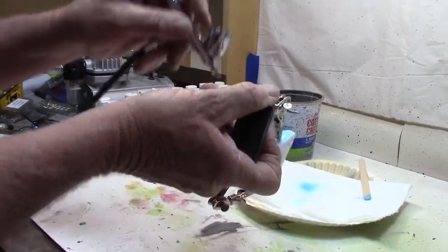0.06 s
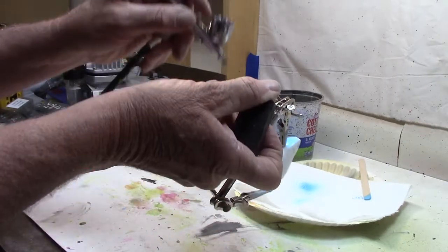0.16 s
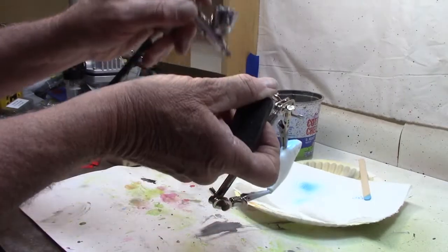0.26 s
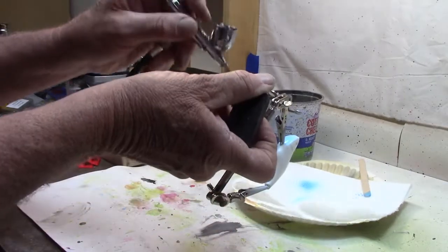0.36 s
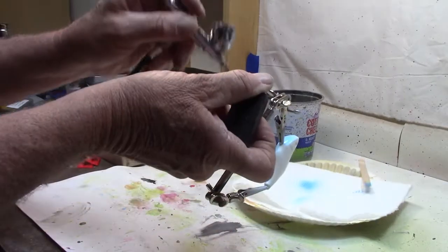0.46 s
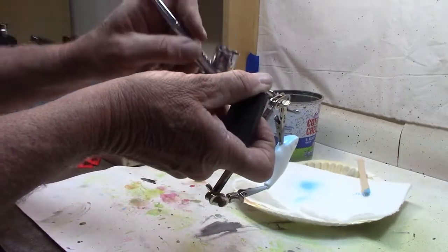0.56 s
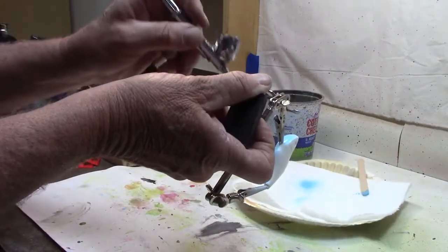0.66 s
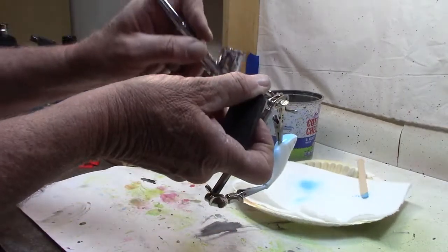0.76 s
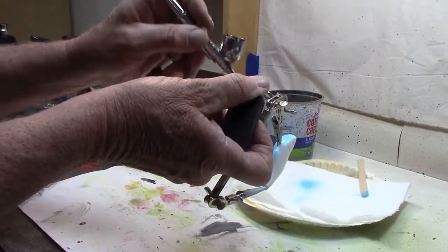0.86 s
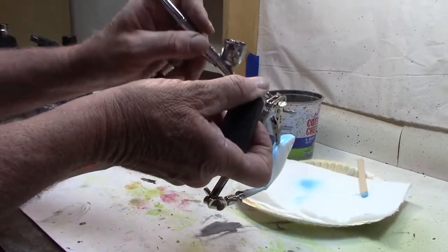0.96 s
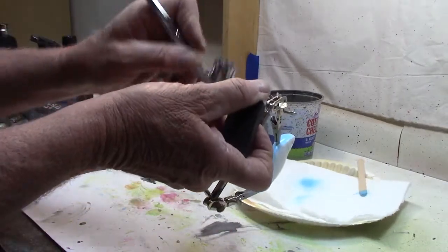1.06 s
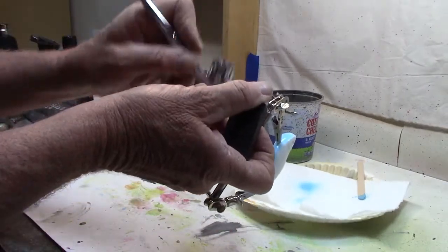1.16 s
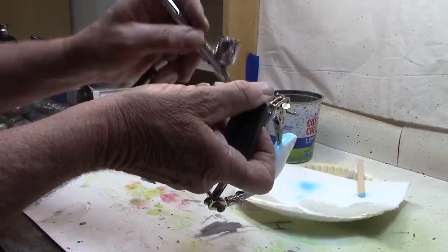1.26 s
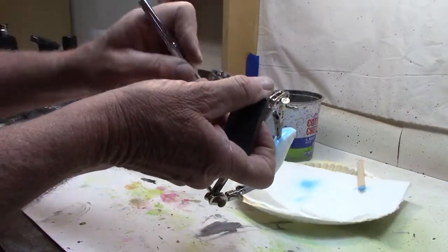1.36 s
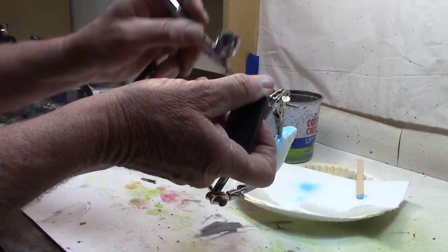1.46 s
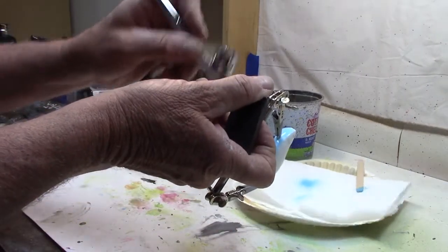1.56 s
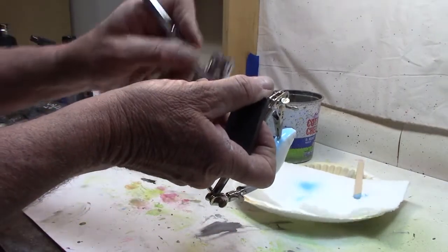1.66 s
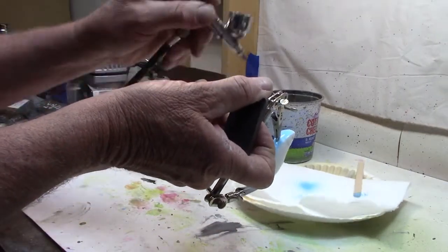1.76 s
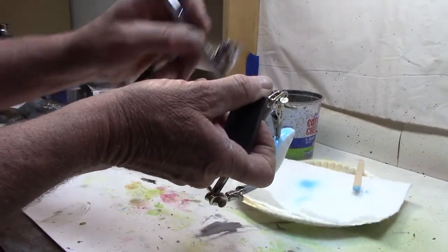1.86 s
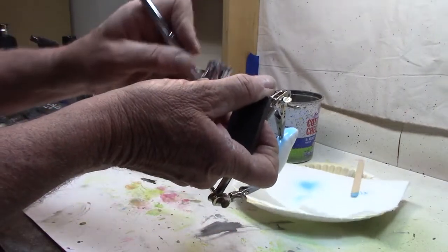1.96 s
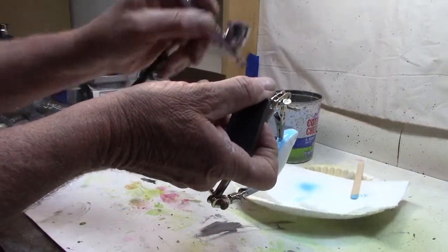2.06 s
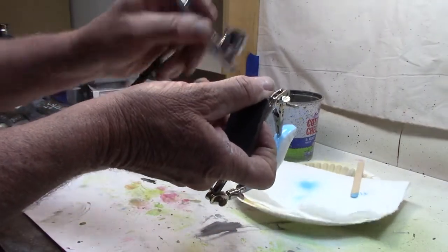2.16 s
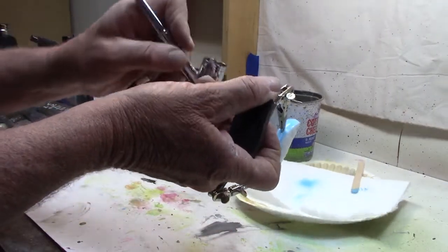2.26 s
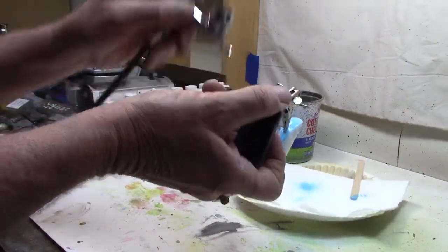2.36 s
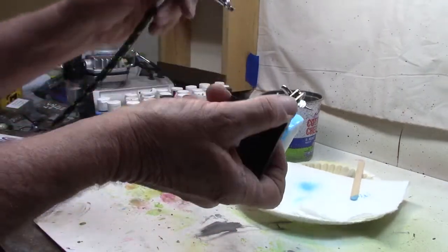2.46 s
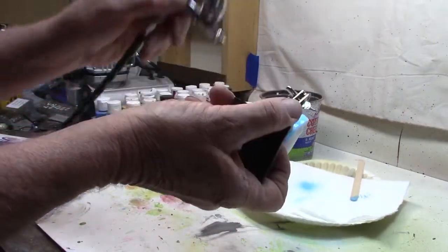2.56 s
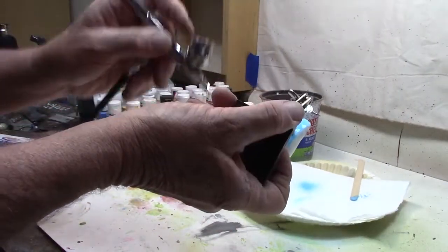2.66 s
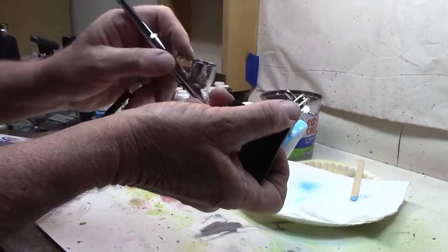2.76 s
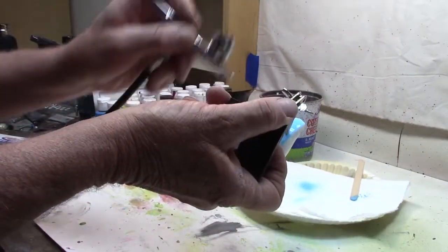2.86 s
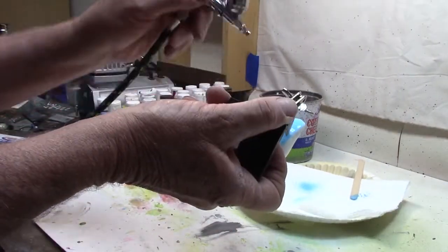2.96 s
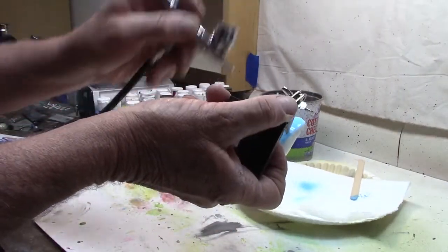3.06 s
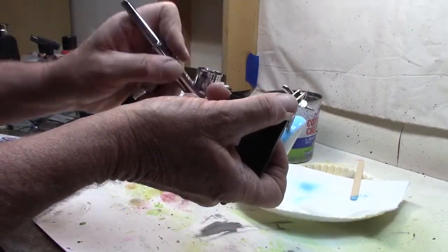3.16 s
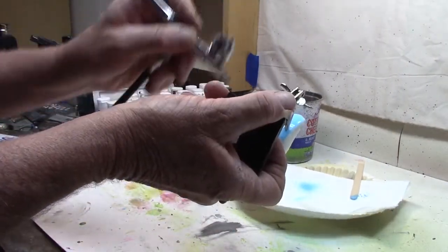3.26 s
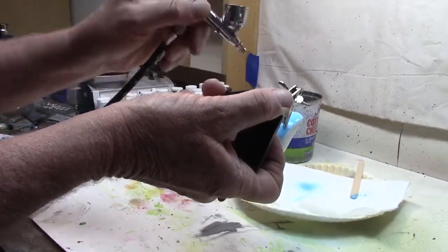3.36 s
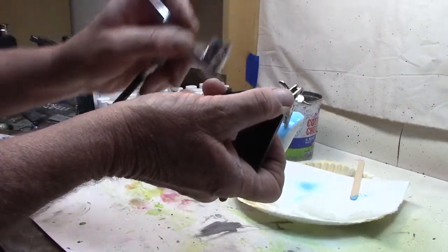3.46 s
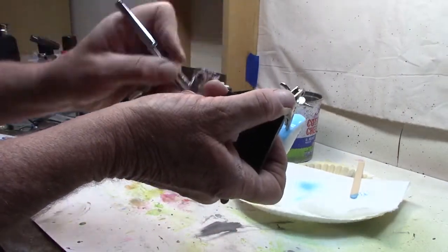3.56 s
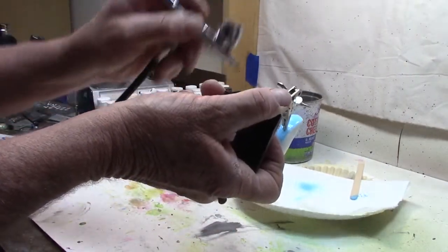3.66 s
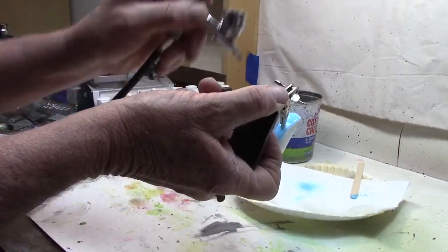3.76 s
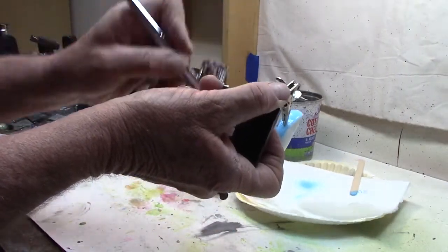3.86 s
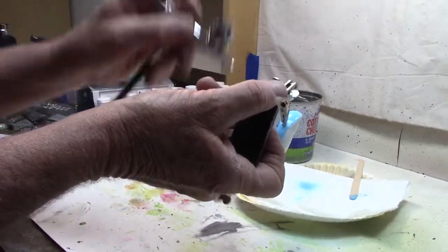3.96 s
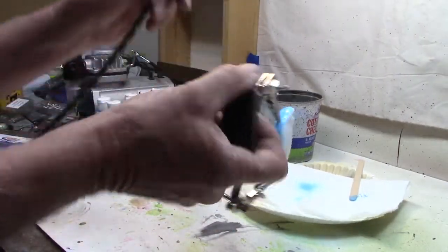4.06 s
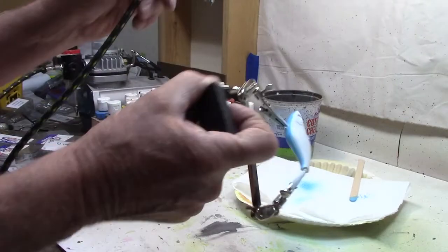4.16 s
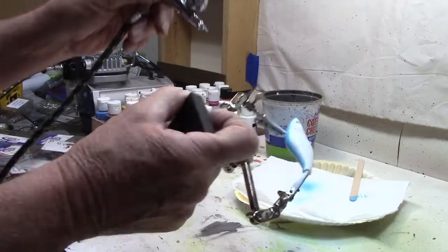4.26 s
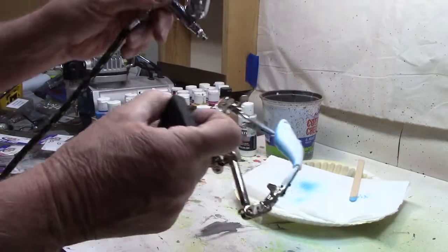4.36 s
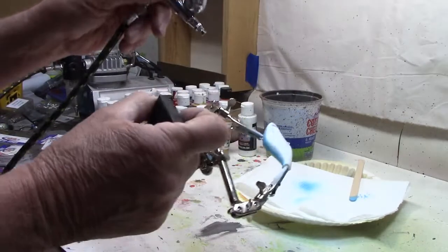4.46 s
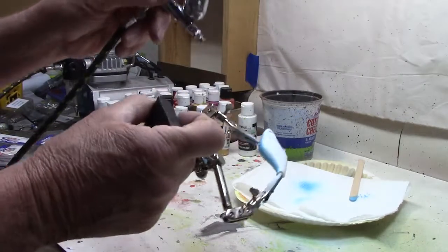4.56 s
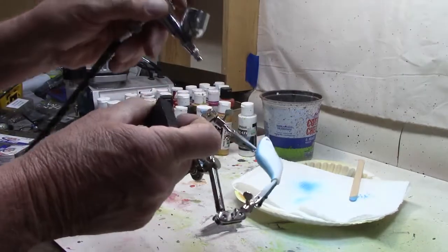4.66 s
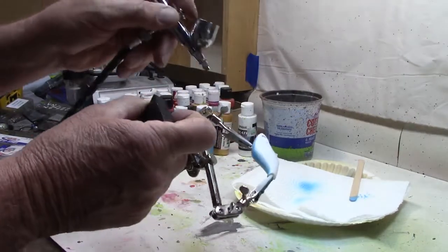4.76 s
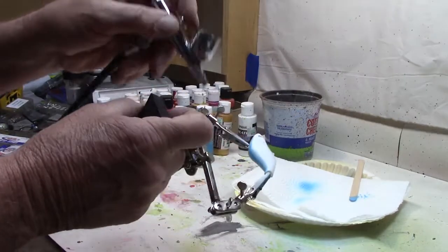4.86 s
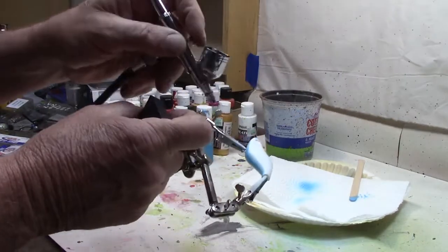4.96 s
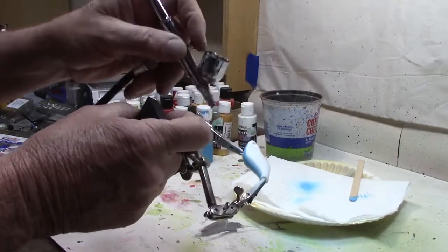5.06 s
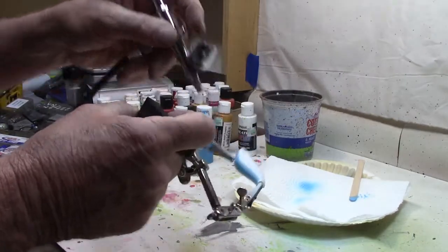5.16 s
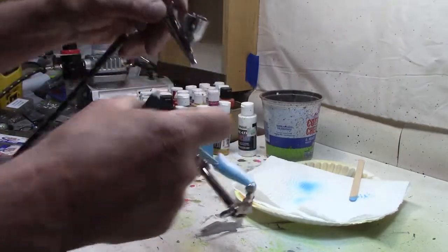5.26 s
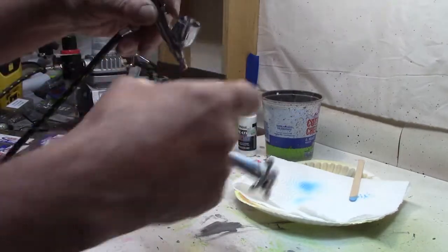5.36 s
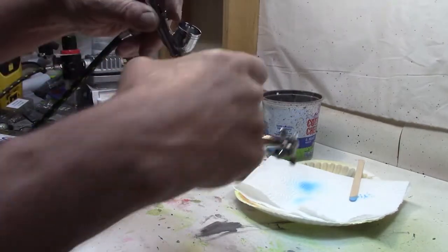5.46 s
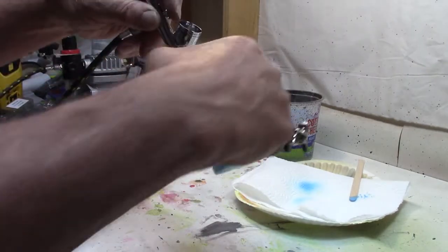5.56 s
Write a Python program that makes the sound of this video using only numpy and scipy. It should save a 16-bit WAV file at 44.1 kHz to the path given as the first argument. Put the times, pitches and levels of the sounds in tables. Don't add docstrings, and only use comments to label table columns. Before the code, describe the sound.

A small piston compressor knocks about twenty-seven times a second, a hard rattling drone already running. An airbrush sprays a long hiss over it, swelling with each pass at a small piece, then snaps shut. A shorter second burst follows and snaps off. Finally a switch clicks, the pump coasts down in slowing thuds, and tiny metal ticks remain. Close stereo microphone, small workshop.

```python
import sys
import numpy as np
from scipy import signal
from scipy.fft import rfft, irfft, next_fast_len
from scipy.io import wavfile
from scipy.ndimage import uniform_filter1d

SR = 44100
rng = np.random.default_rng(int(sys.argv[2]) if len(sys.argv) > 2 else 0)


def invert_db(x):
    u = np.asarray(x, float) / 20
    return 10 ** u


def digitize_waveform(pressure):
    field = np.atleast_2d(pressure).T
    bounded = np.clip(field, -1, 1)
    quanta = np.round(bounded * 32767).astype(np.int16)
    wavfile.write(sys.argv[1], SR, quanta)


N = 246959
TIME = np.arange(N) / SR
STOP_S = 5.0489
SLACK_FADE_S = 5.41
WEAR_DB_PER_S = 0.7


def rms_one(x):
    return x / np.sqrt(np.mean(x ** 2) + 1e-20)


def in_time(rows):
    s, *columns = np.transpose(rows)
    return np.array([np.interp(TIME, s, c) for c in columns])


def after(s):
    return np.maximum(TIME - s, 0)


def at_hz(points, hz):
    points = np.array(points)
    return np.interp(np.log(hz), np.log(points[:, 0]), points[:, 1])


def drift(rate):
    knots = np.arange(0, N / SR + 1, .5 / rate)
    return np.interp(TIME, knots, rng.standard_normal(len(knots)))


def colour(x, spectrum):
    size = next_fast_len(N + 4096)
    hz = np.arange(size // 2 + 1) * SR / size + 1
    return irfft(rfft(x, size) * invert_db(at_hz(spectrum, hz)), size)[..., :N]


def ring(clicks, hz, t60):
    r = invert_db(-60 / (t60 * SR))
    w = 2 * np.pi * hz / SR
    return signal.lfilter([0, np.sin(w)], [1, -2 * r * np.cos(w), r * r], clicks + 1e-18)


def whistle(hz, width_hz):
    t60 = 2.2 / width_hz
    once = ring(rng.standard_normal(N), hz, t60)
    return rms_one(ring(once, hz, t60))


def click(s, db):
    out = np.zeros(N)
    out[round(s * SR)] = invert_db(db)
    return out


def crack(s, db, t60):
    return rng.standard_normal(N) * (TIME >= s) * invert_db(db - 60 * after(s) / t60)


# time in seconds, turns done.
CRANK = [(.0097, 0), (.7352, 20), (1.4604, 40), (2.1863, 60), (2.5505, 70), (3.2799, 90), (4.0081, 110),
         (4.7398, 130), (5.0691, 139), (5.133, 140), (5.2059, 141), (5.2845, 142), (5.3844, 143),
         (5.53, 144)]


def crank_turns():
    return in_time(CRANK)[0] + np.minimum(TIME - CRANK[0][0], 0) * 27.6


def struck(contacts, level_db, jitter_ms, spread_db, shift=((0, 0), (6, 0))):
    s, turns = np.transpose(CRANK)
    s, turns = np.r_[2 * s[0] - s[1], s], np.r_[-turns[1], turns]
    count = np.arange(-4, 144)
    later = np.interp(np.interp(count, turns, s), *np.transpose(shift))
    out = np.zeros(N)
    for late, hz, t60, db, ms in contacts:
        chance = rng.standard_normal((len(count), 3))
        wander_db = 0.5 * rms_one(uniform_filter1d(chance[:, 2], size=9))
        at = (np.interp(count + late + later, turns, s) + chance[:, 0] * jitter_ms / 1000) * SR
        size = invert_db(db + spread_db * chance[:, 1] + wander_db)
        at, size = at[at > 0], size[at > 0]
        i, part = at.astype(int), at % 1
        clicks = np.zeros(N)
        clicks[i], clicks[i + 1] = size * (1 - part), size * part
        half = int(ms * SR / 1000)
        swell = np.arange(-half, half + 1)
        push = np.hanning(len(swell)) * np.cos(2 * np.pi * hz * swell / SR) / len(swell)
        out += ring(signal.oaconvolve(clicks, push, "same"), hz, t60)
    return rms_one(out) * invert_db(level_db)


def small_body(x):
    return -signal.sosfilt(signal.butter(2, 94, "high", fs=SR, output="sos"), x)


def fresh_db():
    return 3.5 * np.exp(-TIME / 1)


COAST = dict(thud_db=26, rebound_db=90, backlash_db=29, between_db=66, ring_db=39, intake_db=137, shoulder_db=81, reed_db=60, strain_db=61, shake_db=45, whistle_db=232, air_db=73)


def thud_db():
    between = COAST["between_db"] * np.sin(np.pi * crank_turns()) ** 2
    return -36 + fresh_db() - after(STOP_S) * (COAST["thud_db"] + between)


# time in seconds, pressure from 0 to 1, whistle of the outlet valve in dB.
PRESSURE = [(0, 0.26, -48), (2.2, 0.17, -42), (2.45, 0.28, -49), (2.75, 0.5, -48), (3.401, 0.42, -39.5),
            (4.05, 0.47, -45), (4.349, 0.6, -39.5), (4.55, 0.88, -43), (4.75, 0.9, -49.5),
            (5.037, 0.94, -50)]
# turns after the thud, pitch in Hz, ring time t60 in seconds, level in dB, contact in ms.
THUD = [(-0.0222, 225, 0.0022, 14.5, 4.1), (-0.0071, 412, 0.23, -24.5, 6.2), (-0.028, 142, 0.15, -22, 15.3),
        (.6, 230, 0.011, -26, 1.3)]
# turns, pitch in Hz, t60 in seconds, level in dB, contact in ms.
REBOUND = [(-.02, 248, 0.0076, 2.5, 3.05), (-.02, 371, 0.043, -15, 11)]


def thuds():
    rebound_turns = [(s, 0.3482 - 0.12 * pressure) for s, pressure, _ in PRESSURE]
    rebound_db = thud_db() - 5 - after(STOP_S) * COAST["rebound_db"]
    return struck(THUD, thud_db() - 1, 0.068, 0.195) + struck(REBOUND, rebound_db, 0.1, 0.71, rebound_turns)


# time in seconds, ring in dB, upper ring over lower in dB.
SHELL = [(0, -27, 6), (.15, -31, 3.5), (.76, -29, -2), (1.0, -30.5, 0.5), (2.37, -30.5, 0.5),
         (2.75, -35.5, -6), (2.88, -38.5, 24), (2.97, -34.5, -28), (3.1, -40, -5), (3.2, -34.5, -31),
         (3.5, -37.5, -19), (3.6, -34, -17), (3.85, -33.5, -10), (4.2, -33.5, -8), (4.29, -36.5, 22),
         (4.42, -38, -12), (4.62, -40.5, -2), (4.9, -34.5, 14)]
# turns after the thud, pitch in Hz, t60 in seconds, level in dB, contact in ms.
LOWER_RING = [(-0.118, 550.5, 0.3, 0, 3.6)]
# turns, Hz, t60 in seconds, dB, contact in ms.
UPPER_RING = [(-0.114, 577.5, 0.3, 0, 3.4)]


def shell_rings():
    shell, tilt = in_time(SHELL)
    coast = after(STOP_S)
    tilt = tilt * invert_db(-60 * coast)
    ring_db = shell - coast * COAST["ring_db"]
    lower = ring_db - 10 * np.log10(1 + invert_db(2 * tilt))
    upper = ring_db - 10 * np.log10(1 + invert_db(-2 * tilt))
    return struck(LOWER_RING, lower - 1.5, 0.26, 1.0) + struck(UPPER_RING, upper + 1.2, 0.088, 0.33)


# turns after the thud, pitch in Hz, t60 in seconds, level in dB, contact in ms.
INTAKE = [(.61, 992, 0.045, -2, 4.5), (0.608, 936, 0.16, -6, 4.5), (.607, 908, 0.16, -9, 4.5)]


def intake_pop():
    opens = [(s, -0.017 * pressure) for s, pressure, _ in PRESSURE]
    level = -41.5 + 0.76 * (in_time(SHELL)[0] + 35) - after(STOP_S) * COAST["intake_db"]
    return struck(INTAKE, level, 0.033, 0.2, opens)


# turns after the thud, pitch in Hz, t60 in seconds, level in dB, contact in ms.
SHOULDER = [(-.103, 603.5, 0.25, 0, 4.0)]
# time in seconds, level in dB.
SHOULDER_HEARD = [(0, -3), (.3, 4), (.8, -18), (2.3, -20), (2.62, -13), (2.95, -19), (3.4, -14), (4.0, -8),
                  (4.3, -4), (4.75, -5), (5.05, -8)]
# turns, pitch in Hz, t60 in seconds, level in dB, contact in ms.
RIM = [(-.102, 632, .2, -1, 3.0), (-.119, 522, .22, -2, 4.0), (-.101, 687, .16, -1, 3.0),
       (-.1, 715, .03, 3, 2.0)]
# time in seconds, level in dB.
RIM_HEARD = [(0, -41), (2.3, -43), (2.9, -42), (4.0, -39.5), (4.4, -42.5), (5.05, -41.5)]


def head_and_fins():
    fade = COAST["shoulder_db"] * after(STOP_S)
    head = struck(SHOULDER, thud_db() - 5 + in_time(SHOULDER_HEARD)[0] - fade, 0.06, 0.52)
    return head + struck(RIM, in_time(RIM_HEARD)[0] - fade, 0.046, 0.5)


# turns after the thud, pitch in Hz, t60 in seconds, level in dB, contact in ms.
REED = [(-0.135, 1987, 0.09, 6, 1), (.1, 1953, 0.045, 7.5, .6), (.63, 1900, 0.043, -4.5, 0.31),
        (-.1, 1560, 0.2, -10, 0.52), (-.08, 3490, 0.055, 0, .4), (-.05, 4810, 0.058, -1, .3)]
# turns, pitch in Hz, t60 in seconds, level in dB, contact in ms.
STRAIN = [(-0.068, 221, 0.13, 6, 3.6), (-0.041, 411, 0.29, -15, 6.7), (-0.35, 410, 0.1, -26, 2.1),
          (-0.098, 2180, 0.051, -4.5, 0.34), (.03, 2150, 0.038, 3, 0.23), (0.22, 2300, 0.071, -12.5, .4),
          (-0.075, 3520, 0.056, -4, 0.45)]


def reed_and_strain():
    coast = after(STOP_S)
    reed = -45.5 + 0.22 * fresh_db() - WEAR_DB_PER_S * TIME - coast * COAST["reed_db"]
    strain = -43.5 + 5.5 * in_time(PRESSURE)[0] + 1.8 * fresh_db() - coast * COAST["strain_db"]
    return struck(REED, reed, 0.034, 1.1) + struck(STRAIN, strain, 0.036, 0.96)


# shakes per turn, level in dB.
SHAKE = [(1, -26), (2, -42.5), (3, -52)]


def hum_and_shake():
    turns, coast = crank_turns(), after(STOP_S)
    throb = 1 + 4.9 * np.cos(2 * np.pi * turns)
    hum = invert_db(-60.5 - 400 * coast) * throb * np.sin(2 * np.pi * 121 * TIME)
    shake = sum(invert_db(db) * np.sin(2 * np.pi * order * turns) for order, db in SHAKE)
    return hum + shake * invert_db(5 * in_time(PRESSURE)[0] - COAST["shake_db"] * coast)


def compressor():
    knocks = thuds() + shell_rings() + intake_pop() + head_and_fins() + reed_and_strain()
    return small_body(knocks) + hum_and_shake()


def puff(turns, start, rise, fall_db, leak, spread_db=6.5):
    angle = (turns - start) % 1
    stroke = np.floor(turns - start).astype(int) + 2
    flow = np.sin(np.minimum(angle / rise, 1) * np.pi / 2) ** 2
    flow *= invert_db(-fall_db * np.maximum(angle - rise, 0))
    strength = invert_db(spread_db * np.clip(rng.standard_normal(150), -1.5, 1.5))
    return rms_one(flow * strength[stroke] + leak)


# pitch in Hz, width in Hz, level in dB.
VALVE = [(3520, 120, -17), (4900, 140, -27), (5440, 420, -9), (6720, 110, -9.5), (7470, 400, -20),
         (8560, 150, -6), (10600, 92, 2), (11300, 155, -2), (11320, 240, 3.5), (10600, 550, -14),
         (12300, 630, -5)]
# frequency in Hz, level in dB per Hz.
VALVE_AIR = [(1000, -5.5), (1400, -7), (2100, -4), (3000, -12.5), (6000, -17), (9000, -20.5), (12300, -22),
             (13000, -31), (14500, -27), (15500, -40)]
# frequency in Hz, level in dB per Hz.
RATTLE = [(1800, -25), (3000, -2), (5500, -4.5), (8500, -2.5), (11000, -10), (12800, -22), (15500, -30)]


def outlet_valve():
    turns = crank_turns()
    stop_db = after(STOP_S) * COAST["whistle_db"]
    air_db = -44 - WEAR_DB_PER_S * TIME - after(STOP_S + 0.022) * COAST["air_db"]
    tones = rms_one(sum(invert_db(db) * whistle(hz, width) for hz, width, db in VALVE))
    tones *= puff(turns, start=-0.14, rise=0.21, fall_db=56, leak=0.026, spread_db=2.1)
    rattle = rms_one(colour(rng.standard_normal(N), RATTLE))
    rattle *= puff(turns, start=0.073, rise=0.088, fall_db=64, leak=.01, spread_db=2.5)
    air = rms_one(colour(rng.standard_normal(N), VALVE_AIR))
    air *= puff(turns, start=-0.12, rise=0.53, fall_db=17, leak=0.85)
    return invert_db(in_time(PRESSURE)[1] - stop_db) * tones + invert_db(-52.5 - stop_db) * rattle + invert_db(air_db) * air


# frequency in Hz, level in dB per Hz.
ROOM = [(25, 19.5), (60, 5.5), (120, -9.5), (305, -2), (500, -7.5), (1300, -15), (2800, -17), (8800, -25),
        (12000, -34), (13500, -49), (16000, -52)]


def room_tone():
    return invert_db(-46) * rms_one(colour(rng.standard_normal(N), ROOM))


# trigger down, paint flows, trigger up (all in seconds), level in dB, shutting in dB per second.
BURSTS = [
    (0.198, 0.477, 2.362, 0.6, 1409),
    (2.82, 2.859, 3.974, 1.34, 1250),
]
# time and half length in seconds, impact in dB, fine hiss in dB.
PASSES = [(0.562, 0.26, 2, 1), (0.89, 0.16, 2, 1), (1.123, 0.055, 5, 2.5), (1.374, 0.11, 4.5, 1.5),
          (1.643, 0.11, 6, 2.5), (1.964, 0.1, 6, 1.5), (2.27, 0.1, 6.5, 0.5), (2.866, 0.033, 6, 0),
          (2.989, 0.061, -1.8, 3), (3.166, 0.15, 4.5, 0), (3.56, 0.11, 5.5, 0), (3.895, 0.066, 5, 0.5)]
# level in dB of fine hiss, impact on the piece, mid hiss, low rush.
AIR_ONLY_DB = [-4, -9, -6, -12.5]
FLOWING_DB = [1.0, -2.2, -0.56, -1.1]
SAG_DB_PER_S = [0.4, 1.5, 0.1, 0.66]


def spray():
    impact, fine = sum(np.outer([a, b], np.exp(-((TIME - s) / half) ** 2)) for s, half, a, b in PASSES)
    aim = np.array([fine, impact, 0.3 * impact, 0.67 * impact]) + np.c_[FLOWING_DB]
    bursts = []
    for down, paint, up, db, shut_db in BURSTS:
        opening = -1200 * np.maximum(down - TIME, 0)
        pop = 4 * np.exp(-after(down) / 0.0052)
        valve = db + opening + pop - shut_db * after(up)
        flowing = np.clip(.5 + (TIME - paint) / 0.035 / 2, 0, 1)
        painted = aim - np.c_[SAG_DB_PER_S] * after(paint)
        bursts.append(valve + (1 - flowing) * np.c_[AIR_ONLY_DB] + flowing * painted)
    return np.maximum(np.max(bursts, axis=0), -90)


# frequency in Hz, region number.
JET_BANDS = [(1400, 3), (2600, 2), (4560, 2), (5750, 1), (7000, 1), (9000, 0)]
# frequency in Hz, level in dB per Hz.
JET_LOW = [(70, -55), (150, -11), (300, -6), (450, -5), (800, -5)]
# frequency in Hz, level in dB per Hz.
JET = [(650, -37), (1100, -7), (1490, -10.5), (1950, -9), (2670, -9.5), (4030, -9), (4800, -8), (5400, -2),
       (6800, -2.5), (7600, -3), (11800, -8.5), (14000, -13.5), (16000, -9.5)]
# pitch in Hz, width in Hz, level in dB.
JET_WHISTLES = [(6620, 260, -16.5), (5820, 370, -14), (2698, 64, -22), (12700, 2100, -17.5)]


def airbrush(patchy_db=1.0):
    level = spray()
    white, out = rng.standard_normal((2, N)), np.zeros(N)
    edges = 80 * 2 ** np.arange(0, 8.1, 1 / 3)
    together = drift(14)
    for k, (low, high) in enumerate(zip(edges, edges[1:])):
        middle = np.sqrt(low * high)
        share = [at_hz([(hz, region == j) for hz, region in JET_BANDS], middle) for j in range(4)]
        band = signal.sosfilt(signal.butter(3, [low, high], "band", fs=SR, output="sos"), white[k % 2])
        out += band * invert_db(share @ level + patchy_db * (0.81 * together + drift(20)))
    jet = colour(out, JET_LOW + JET[1:])
    jet /= np.std(jet[int(.6 * SR):int(2.3 * SR)])
    for hz, width, db in JET_WHISTLES:
        jet += whistle(hz, width) * invert_db(db + level[1] + 3 * drift(3))
    return invert_db(-23.5) * jet


# time in seconds, peak in dB, needle ring in dB.
SNAPS = [
    (2.386, -6, -21.5),
    (4.0035, -5.5, -27),
]
# pitch in Hz, level in dB, t60 in seconds.
TRIGGER = [(2080, -4.5, 0.02), (2650, -17, 0.024), (3075, 1, 0.024), (3320, -7, 0.029), (4092, -5.5, 0.054),
           (4190, -16, 0.032), (4260, -8, 0.056), (5660, -6, 0.031), (6150, -11, 0.046), (11600, 0, .01),
           (11850, -11, 0.045), (12500, -9, .03)]


def trigger():
    out = np.zeros(N)
    for s, db, needle_db in SNAPS:
        blow = click(s + 0.00036, db + 2.0) + crack(s, db - 6.0, 0.0053) + crack(s + .0092, db - 13.0, 0.0023)
        body = sum(ring(blow, hz, t60) * invert_db(m - 15.5) for hz, m, t60 in TRIGGER)
        out += colour(body, [(1000, -23.0), (2000, 0.5)])
        out += colour(crack(s, db - 0.5, 0.0027), [(4000, -23), (6500, -9), (12000, 8.0), (16000, -12)])
        needle = click(s + 0.00021, db + needle_db + 3)
        for side in (1, -1):
            out += ring(needle, 9350 + side * 7.5 / 2, 0.2)
        noise = crack(s, db - 10.0, 0.036) + crack(s, db + 2, 0.003) + crack(s + 0.0088, db - 13.5, 0.028)
        out += colour(noise, [(1200, -26), (2200, -4.0), (4200, 5.0), (5500, -3.0), (12000, -3.0), (16000, -21)])
    return out


# time in seconds, peak in dB, pitch in Hz, t60 in seconds.
TICKS = [(2.5121, -44, 6000, 0.022), (2.5565, -37, 6500, .02), (2.6309, -36, 6000, 0.016),
         (2.7396, -27, 6500, 0.022), (4.2668, -32, 6500, 0.018), (4.4519, -26, 6500, 0.022),
         (4.5572, -36, 6000, .02), (4.7382, -37, 7500, 0.017), (2.813, -14.5, 8040, 0.025),
         (4.116, -21.5, 8650, 0.059), (4.119, -22.5, 3870, 0.089), (4.198, -32, 6360, 0.036),
         (4.2305, -30, 8600, 0.03), (4.374, -32, 6000, 0.017), (4.136, -28, 8700, 0.038),
         (4.2012, -24.5, 8860, 0.062), (4.4901, -26.5, 5440, 0.04), (4.674, -27.5, 5130, 0.046),
         (5.052, -21, 7500, 0.093), (5.46, -24, 8600, 0.033), (5.495, -46, 4500, .02),
         (5.543, -52, 8500, .02), (5.5553, -27, 8550, 0.046)]
# pitch in Hz, level in dB, t60 in seconds.
COOLING = [(2520, -15, 0.03), (3300, -11, .03), (5400, -6, .03), (6770, -6, .024), (8240, -17, .07)]


def ticks():
    out = np.zeros(N)
    for s, db, hz, t60 in TICKS:
        out += ring(crack(s, db - 23.0, 0.008), hz, 0.49 * t60)
        noise = crack(s, db - 2.0, t60) + crack(s, db - 14.0, 0.013)
        out += colour(noise, [(1500, -30), (3500, -9), (hz, 0), (11000, -9), (15500, -22)])
        if s > 4.9:
            out += sum(ring(click(s, db + m - 10), f, t) for f, m, t in COOLING)
    return out


# pitch in Hz, level in dB, t60 in seconds.
SWITCH = [(5900, -15, 0.05), (6760, 4.5, 0.062), (7200, 4, 0.044), (7950, -4, 0.051), (8500, 3, 0.08),
          (10200, 0.5, 0.042), (11900, -6, .04), (14500, -14, 0.016)]


def pressure_switch():
    out = np.zeros(N)
    for hz, db, t60 in SWITCH:
        out += ring(click(STOP_S + .001, db - 30) + crack(STOP_S, db - 53, 0.016), hz, t60)
    return out


# turns, pitch in Hz, t60 in seconds, level in dB, contact in ms.
COAST_RING = [(-0.021, 900, 0.24, -3, 3.0), (-0.039, 670, 0.088, -2, 2.5), (-0.054, 690, 0.032, 9, 2.0)]
# turns, pitch in Hz, t60 in seconds, level in dB, contact in ms.
BACKLASH = [(0.7, 575, 0.19, -9, 3.5), (0.3, 300, 0.15, -14, 5.0), (.1, 740, 0.13, -17, 4.0),
            (-.02, 2120, 0.022, -17, .6), (0.7, 920, 0.11, -15.5, 2.4), (-0.02, 263, 0.025, 5, 4.4)]


def coasting():
    coast = after(STOP_S)
    loose = struck(COAST_RING, -39 - 110 * coast, 0.056, 1.5) * np.minimum(coast / 0.095, 1)
    slack = struck(BACKLASH, -34.5 - coast * COAST["backlash_db"], 0.083, 2.0)
    return small_body(loose + slack * np.minimum(coast / 0.17, 1) * invert_db(-150 * after(SLACK_FADE_S)))


def bleed():
    start_s, hold_s = 5.08, 0.27
    return (TIME > start_s) * invert_db(-58 - 80 * after(start_s + hold_s)) * whistle(4940, 1500)


def shop(x):
    size = int(0.33 * SR)
    age = np.arange(size)
    tail = rng.standard_normal((2, size)) * invert_db(-60 * age / size) * (age > .004 * SR)
    tail /= np.sqrt(np.sum(tail ** 2, axis=1, keepdims=True))
    return signal.fftconvolve(x[None], tail, axes=1)[:, :N]


# frequency in Hz, level in dB.
WALLS = [(100, -12), (500, -9), (1200, -6), (4000, -2), (9000, -6.5), (14000, -8)]
# frequency in Hz, side minus middle in dB.
WIDTH = [(30, -27), (60, -11), (130, -45), (250, -30.5), (450, -24.5), (578, -29.5), (750, -29.5),
         (1100, -32.5), (1900, -20), (4970, -18), (9000, -16), (15000, -15)]


def scene():
    dry = compressor() + outlet_valve() + room_tone() + airbrush() + trigger() + ticks()
    dry += pressure_switch() + coasting() + bleed()
    wet, other = shop(dry)
    return dry + invert_db(-12.5) * colour(wet, WALLS) + colour(other, WIDTH) * np.array([[1], [-1]])


def top_cut(x):
    return signal.sosfilt(signal.butter(12, 16530, fs=SR, output="sos"), x)


def record(dry):
    mix = 1.6 * np.tanh(dry / 1.6)
    mix = signal.sosfilt(signal.butter(3, 117, "high", fs=SR, output="sos"), mix)
    mix = signal.sosfilt(signal.cheby2(14, 60, 16150, fs=SR, output="sos"), mix)
    return top_cut(mix)


dry = scene()
out = record(dry)
digitize_waveform(out)
```